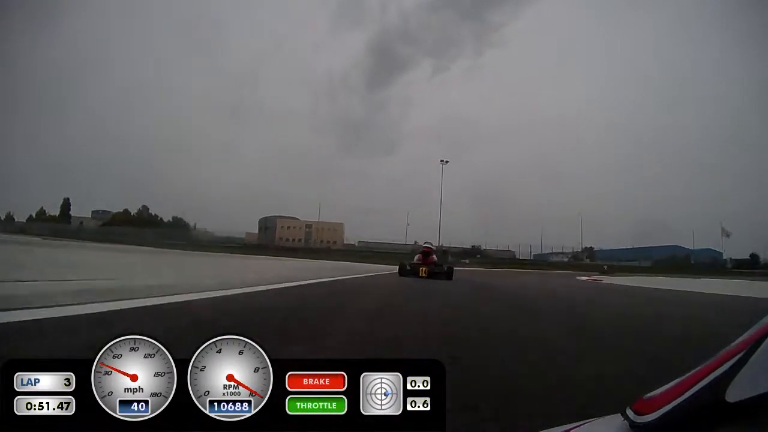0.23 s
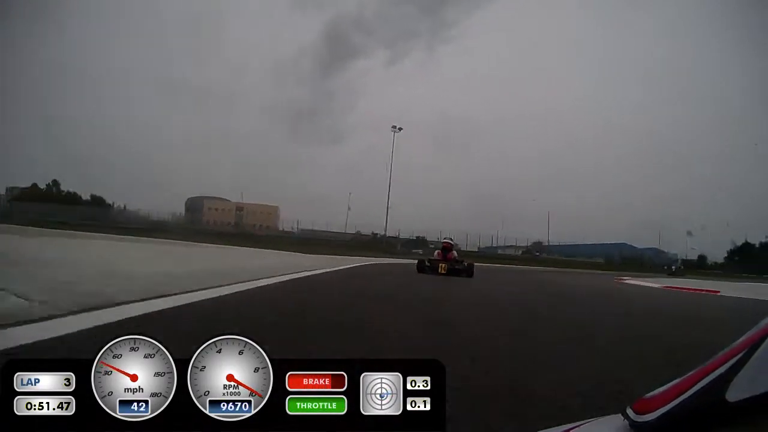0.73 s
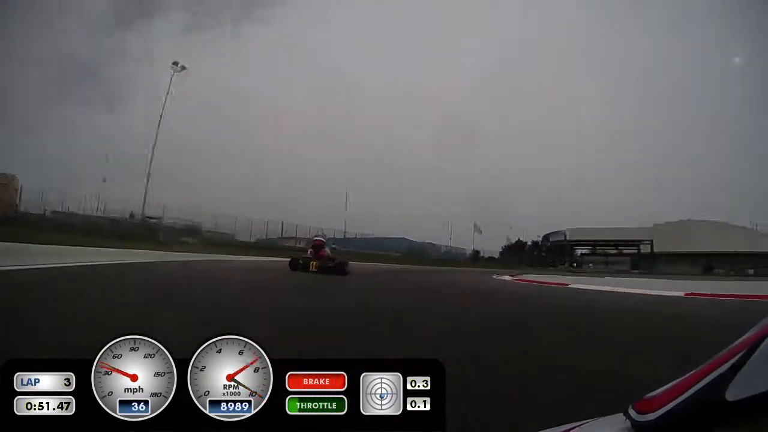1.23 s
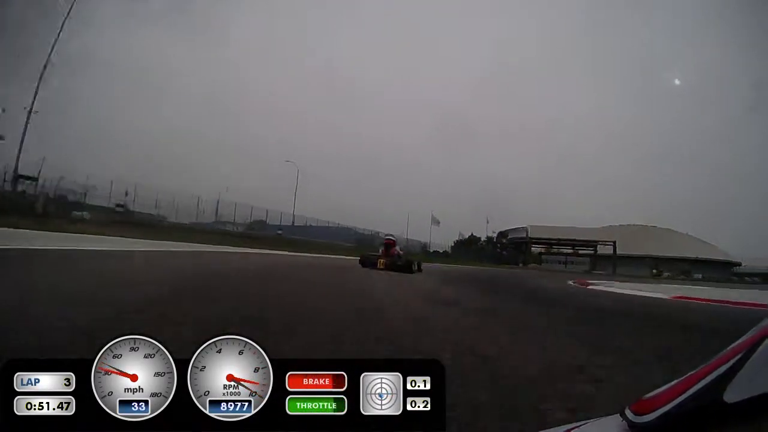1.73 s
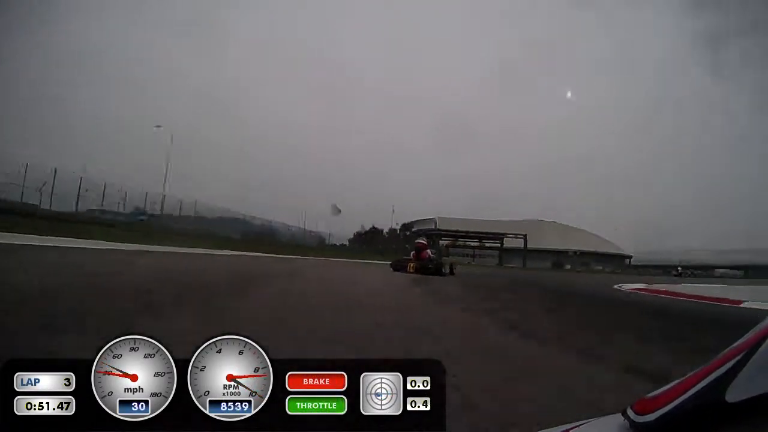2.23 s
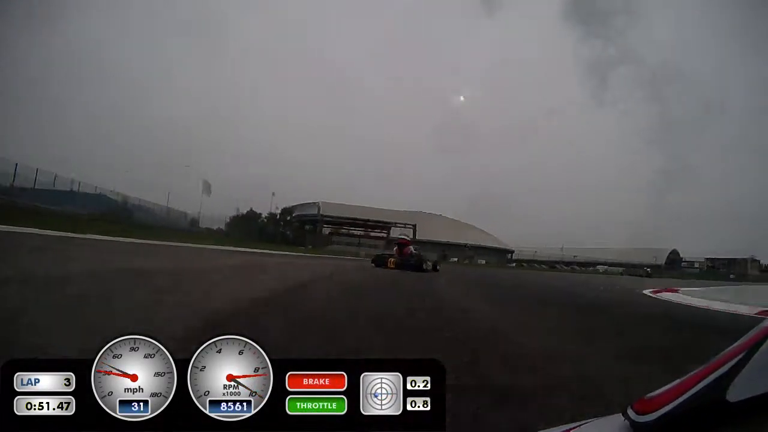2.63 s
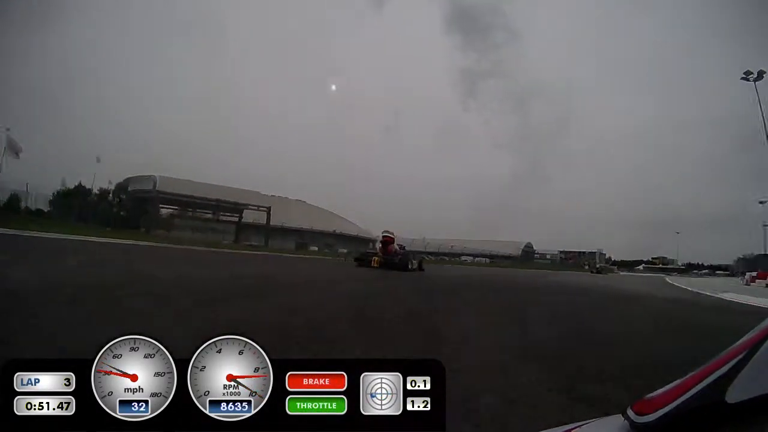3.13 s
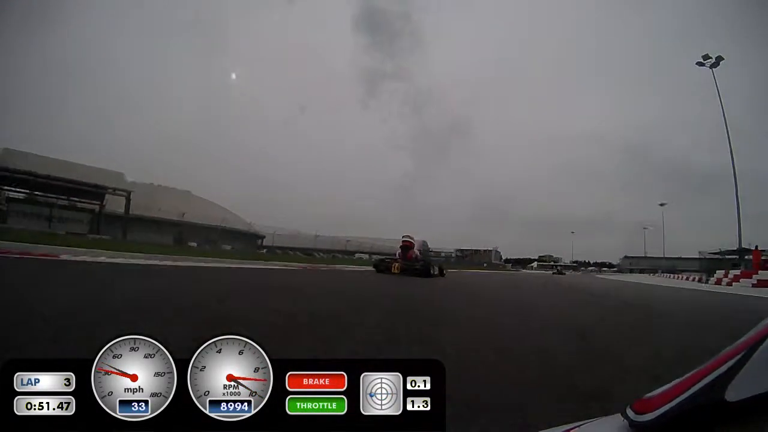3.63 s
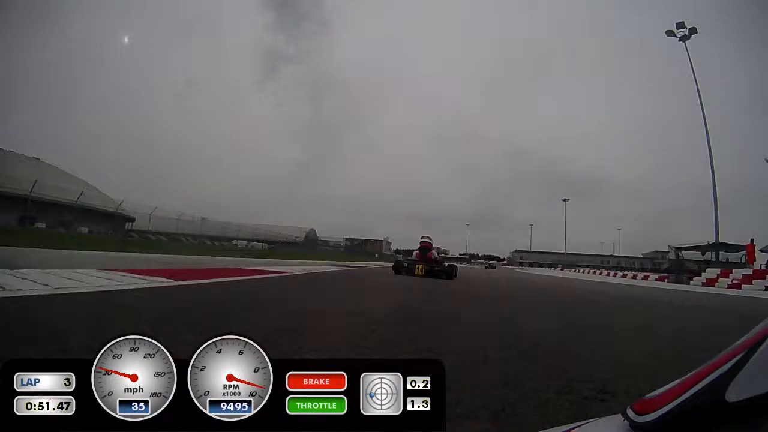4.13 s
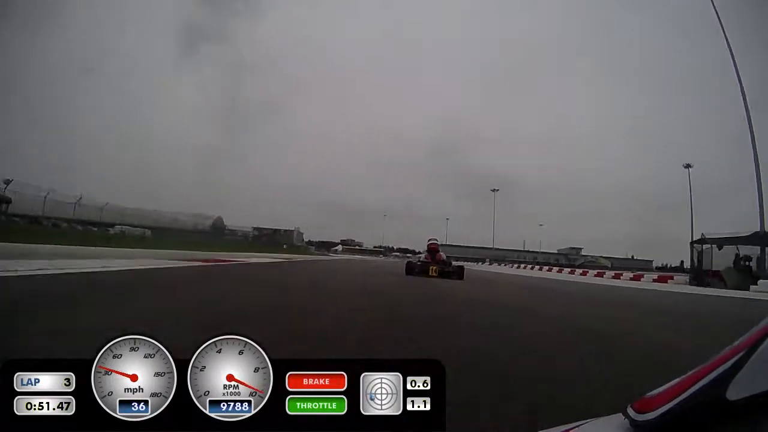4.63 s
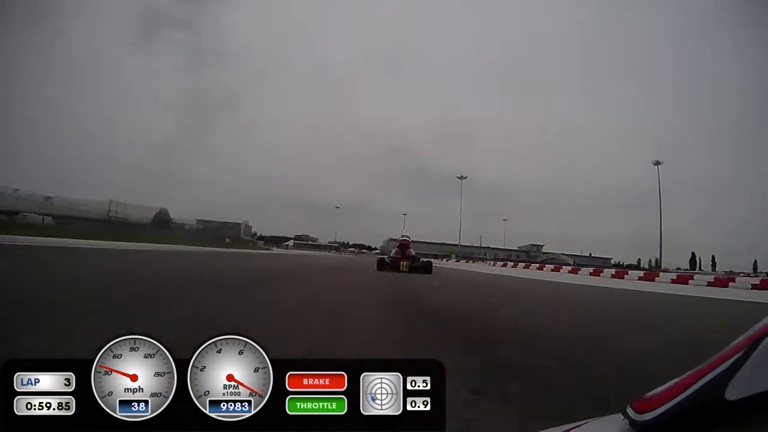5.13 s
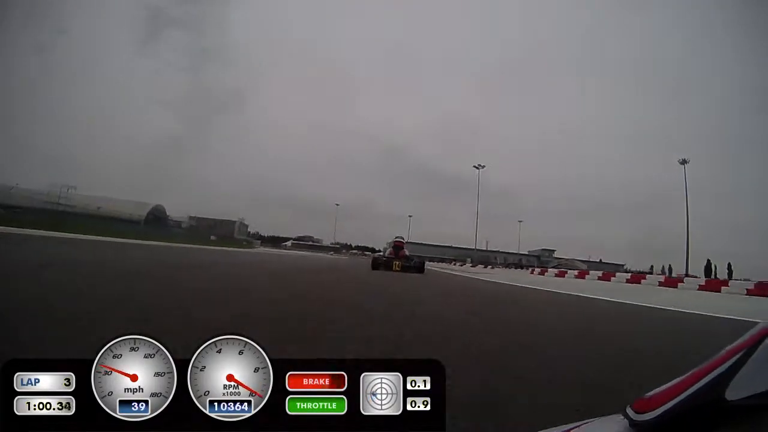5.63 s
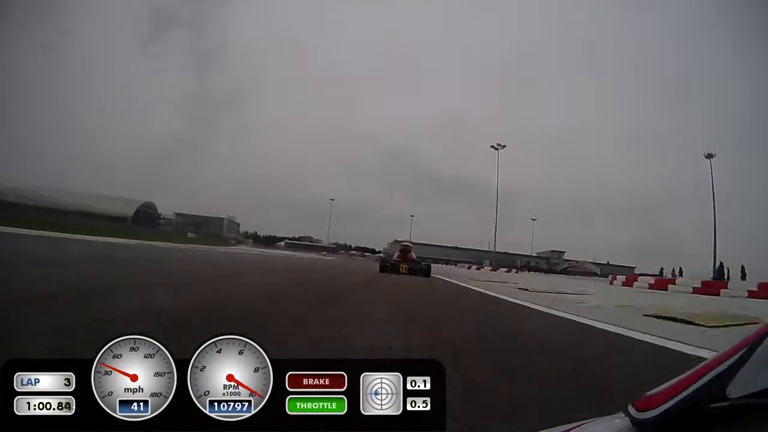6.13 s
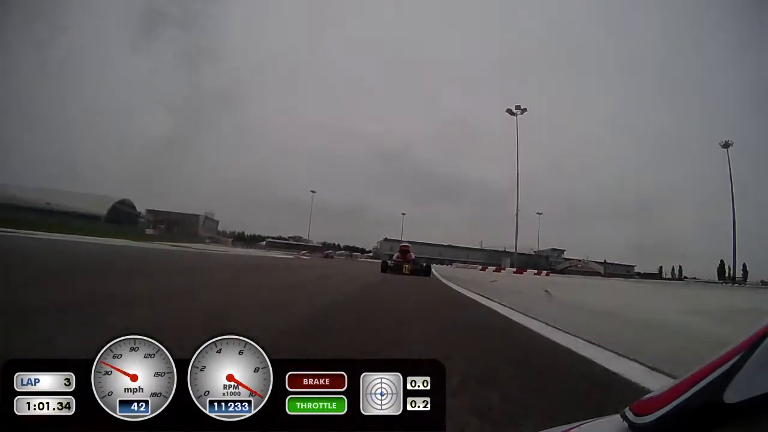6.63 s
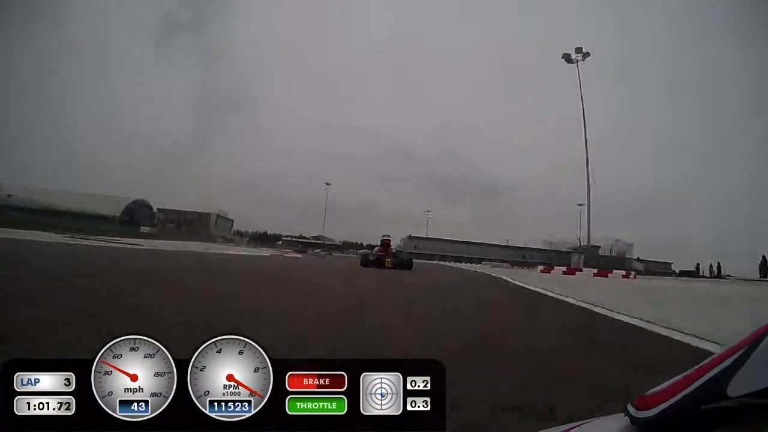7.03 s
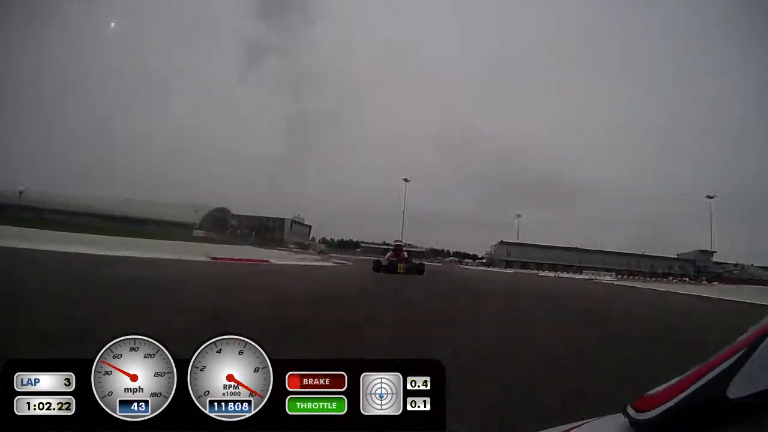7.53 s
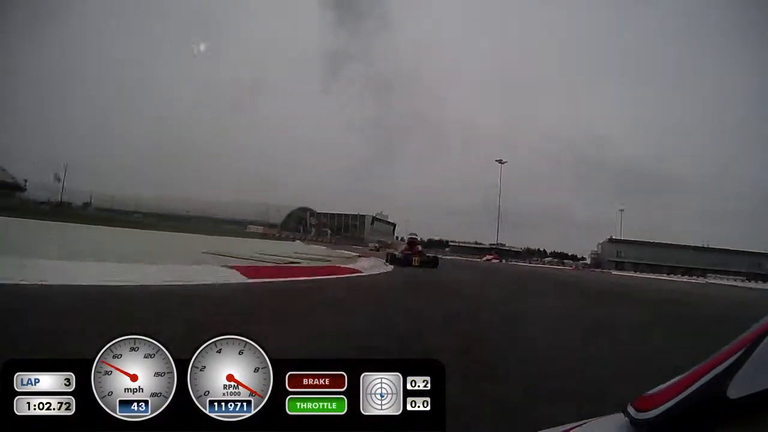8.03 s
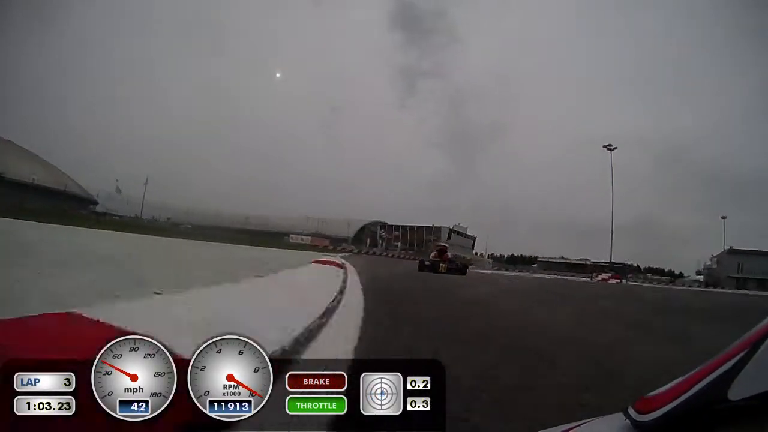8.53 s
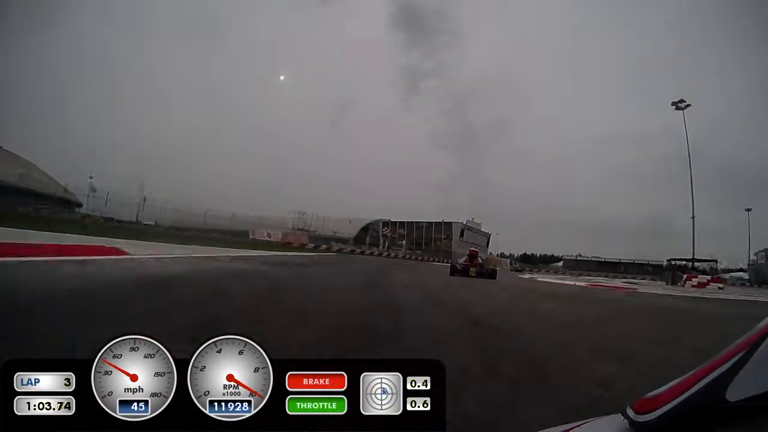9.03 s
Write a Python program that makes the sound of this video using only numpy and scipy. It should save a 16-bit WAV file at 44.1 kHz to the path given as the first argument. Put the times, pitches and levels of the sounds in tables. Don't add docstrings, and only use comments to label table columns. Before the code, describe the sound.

A small two-stroke kart engine is heard from a microphone fixed to its shaking frame on an open circuit. It starts as a high, rough, clipped drone with a nasal housing buzz. At about 0.5 s the driver lifts and the pitch plunges, reaching bottom near 0.85 s with throbbing hiss, flutter and gust thumps, then springs back by about 1.1 s. The revs sag to a lower, steadier growl around 2 to 2.7 s, then climb gradually from 3 s, with surges of buzz near 3.5, 4.2 and 5.8 s and a heavy wind puff around 5.2 s. From 6.9 s the engine is high and strained, with brighter hiss, crackling gusts and knocks. The strongest rattling bursts hit around 8.3 to 8.4 s; revs dip slightly, then rise again until the end at about 9.3 s. Low wind buffeting and a broad roar persist throughout.

```python
import sys
import numpy as np
from scipy import signal
from scipy.fft import rfft, irfft
from scipy.io import wavfile
from scipy.ndimage import uniform_filter1d

SR = 44100
rng = np.random.default_rng(int(sys.argv[2]) if len(sys.argv) > 2 else 0)


def to_wav(s):
    ch = np.atleast_2d(s).T
    pcm = np.round(np.clip(ch, -1, 1) * 32767)
    wavfile.write(sys.argv[1], SR, pcm.astype(np.int16))


def convert_level_to_amplitude(level_db):
    exponent = np.asarray(level_db, float) / 20
    return 10 ** exponent


N = 409248
TIME_S = np.arange(N) / SR
INPUT_LIMIT = 0.51
LIFT_S, LOWEST_S = 0.46, 0.845


def evened(x):
    return x / np.sqrt(np.mean(x ** 2) + 1e-20)


def over_time(rows):
    s, value = np.transpose(rows)
    return np.interp(TIME_S, s, value)


def read(points, hz):
    f, value = np.transpose(points)
    return np.interp(np.log(hz + 1), np.log(f + 1), value)


def coloured(points):
    spectrum = rfft(rng.standard_normal(N))
    return evened(irfft(spectrum * convert_level_to_amplitude(read(points, np.fft.rfftfreq(N, 1 / SR))), N))


def drift(top_hz):
    return evened(signal.lfilter(*signal.butter(2, top_hz, fs=SR), rng.standard_normal(N)))


def ring(x, modes):
    out = 0
    for k, (hz, width_hz, db) in enumerate(modes):
        resonance = signal.iirpeak(hz, hz / width_hz, fs=SR)
        out = out + (-1) ** k * convert_level_to_amplitude(db) * signal.lfilter(*resonance, x)
    return out


def swells(rows):
    t = np.arange(0, N + 64, 64) / SR
    bells = sum(height * np.exp(-((t - s) / length_s) ** 2) for s, length_s, height in rows)
    return np.interp(TIME_S, t, bells)


# time_s, crank_hz
DRIVEN_REVS = [(0.0, 177.8), (0.3, 181.6), (0.5, 182.0), (1.3, 161.8), (1.44, 156.7), (1.68, 146.1),
               (1.91, 142.9), (2.7, 142.2), (3.4, 148.6), (4.2, 162.2), (4.5, 163.3), (5.2, 168.2),
               (6.0, 180.1), (7.11, 196.0), (7.83, 199.1), (8.43, 198.6), (8.63, 195.9), (9.28, 203.9)]


def revs():
    drop_hz, brake_shape = 99, 1.5
    spring_s, spring_shape = 0.145, 1.3
    braking = np.clip((TIME_S - LIFT_S) / (LOWEST_S - LIFT_S), 0, 1) ** brake_shape
    after_s = np.maximum(TIME_S - LOWEST_S, 0)
    still_down = np.exp(-(after_s / spring_s) ** spring_shape)
    return over_time(DRIVEN_REVS) - drop_hz * braking * still_down


def crank_angle():
    hz = revs() * (1 + 0.002111 * drift(top_hz=23.6))
    return 2 * np.pi * np.cumsum(hz) / SR


def unsettled():
    relock_s = 0.29
    steady_s = LOWEST_S + relock_s
    return np.interp(TIME_S, [LIFT_S, LOWEST_S, steady_s, steady_s + 0.15], [0, 1, 1, 0])


# crank_hz, level_db
FIRST = [(74, -11), (125, -8.5), (145, -5.5), (168, -4), (185, -6), (190, -10), (197, -13), (204, -13)]
SECOND = [(74, -18), (125, -19), (143, -26), (150, -25), (166, -36), (180, -26), (189, -16), (200, -15.5)]
THIRD = [(178, -46.5), (188, -34), (197, -29.5), (204, -38.5)]
FOURTH = [(100, -39), (143, -33), (152, -38.5), (162, -31), (170, -35.5), (178, -40.5), (184, -27.5),
          (193, -39.5)]
FIFTH = [(143, -46), (152, -43), (155, -31.5), (168, -29), (172, -43), (181, -47), (187, -29), (198, -40)]


def shake(angle):
    hz = revs()
    fifth_db = read(FIFTH, hz) - 14 * unsettled()
    orders = [
        (1, read(FIRST, hz), 0.7, 0.069),
        (2, read(SECOND, hz), 1.4, 1.54),
        (4, read(FOURTH, hz), 1.7, 0.0037),
        (5, fifth_db, 1.5, 0.4),
        (7, fifth_db - 8.5, 3.0, 0.76),
        (3, read(THIRD, hz), 1.4, 0.8),
    ]
    out = np.zeros(N)
    for order, level_db, waver_db, lag in orders:
        level = convert_level_to_amplitude(level_db + waver_db * drift(top_hz=7.5))
        out += level * np.sin(order * angle + lag)
    return np.sqrt(2) * out


# hz, level_db (per Hz)
BLOW = [(200, 3.5), (500, -3.5), (900, -20.5), (1300, 4), (2200, -8.5), (3000, -31), (5000, -19),
        (8000, -43)]


def firings(angle):
    hz = revs()
    orders = np.arange(3, 36)
    lags = rng.uniform(0, 2 * np.pi, len(orders))
    blow = np.zeros(N)
    for order, lag in zip(orders, lags):
        level = convert_level_to_amplitude(read(BLOW, order * hz[::64])).repeat(64)[:N]
        blow += level * np.cos(order * angle + lag)
    turns = angle / (2 * np.pi)
    strength_db = 0.73 * rng.standard_normal(int(turns[-1]) + 2)
    return evened(blow) * convert_level_to_amplitude(np.interp(turns, np.arange(len(strength_db)), strength_db))


# crank_hz, share
BESIDE = [(143, .95), (144.5, .2), (152, .25), (155, .8), (163, .6), (165, .2), (170, .6), (174, .2)]


def whine(angle):
    lock_top_hz = 1843
    hz = revs()
    beside = read(BESIDE, hz)
    chosen = np.floor(lock_top_hz / hz)
    nearness = 1 / np.hypot(1, (chosen * hz - 1800) / 90)
    tone = {k: np.cos(k * angle + 0.7 * k) for k in range(8, 15)}
    held = np.zeros(N)
    for k in range(9, 14):
        turn_on = uniform_filter1d(1.0 * (chosen == k), 1500)
        held += turn_on * (tone[k] + beside * (0.8 * tone[k - 1] - tone[k + 1]))
    return np.sqrt(2) * held * uniform_filter1d(nearness, 1500) * convert_level_to_amplitude(1.2 * drift(top_hz=29.2))


# pitch_hz, width_hz, level_db
HOUSING = [(1590, 160, -13), (1788, 50, 0), (2080, 320, -19)]
# crank_hz, share
LOCKED = [(74, 0.8), (143, 0.58), (166.5, 0.68), (168.5, 0.6), (172, 0.5), (174, 0.53), (184.5, 0.76),
          (186, 0.37)]
# time_s, level_db
BUZZ_LEVEL = [(0, -24), (.5, -21), (.7, -30.5), (.93, -35), (1.12, -24.5), (1.8, -23), (1.95, -27.5),
              (3.35, -24.5), (3.8, -22.5), (5.25, -21.5), (5.45, -24), (6.25, -20), (6.35, -21.5), (7, -23),
              (8, -21.5), (8.5, -23.5), (9.28, -24)]


def buzz(angle, surge_db):
    locked = read(LOCKED, revs()) + 0.01 * surge_db - 0.25 * unsettled()
    locked = np.clip(locked, 0, 1)
    blows = firings(angle)
    in_step = 0.95 * whine(angle) + 0.3 * evened(ring(blows, HOUSING) + 0.15 * blows)
    rattle = rng.standard_normal(N) * convert_level_to_amplitude(2.1 * drift(top_hz=39.3))
    loose = 1.124 * evened(ring(rattle, HOUSING))
    level = convert_level_to_amplitude(over_time(BUZZ_LEVEL) + surge_db + 4.0)
    return level * (locked * in_step + (1 - locked) * loose)


# pitch_hz, width_hz, level_db
PORT = [(3690, 220, 0), (4040, 280, -1.5), (4740, 200, -3.5), (4950, 150, 0), (5480, 300, -12),
        (6500, 700, -20)]
# crank_hz, level_db
HISS_LEVEL = [(74, -46.5), (128, -45), (145, -42), (166, -40.5), (176, -37.5), (185, -33), (195, -29.5),
              (202, -32.5)]
# crank_hz, level_db
FIZZ_LEVEL = [(120, -15), (142, -3), (180, -4.5), (195, -13.5)]


def hiss(surge_db):
    throb_hz, throb_peak_s = 20.3, 0.648
    hz = revs()
    air = evened(ring(rng.standard_normal(N) * convert_level_to_amplitude(1.47 * drift(top_hz=60)), PORT))
    fizz = coloured([(2000, -9.5), (3000, -7.5), (4200, 7), (5500, -2.5), (7500, -14.5)])
    fizz = fizz * convert_level_to_amplitude(2.5 * drift(top_hz=45))
    both = air * convert_level_to_amplitude(1.4 * drift(top_hz=26)) + convert_level_to_amplitude(read(FIZZ_LEVEL, hz)) * fizz
    overrun = np.clip((150 - hz) / 12, 0, 1) * (TIME_S < 1.1)
    throb = np.cos(2 * np.pi * throb_hz * (TIME_S - throb_peak_s)) - 0.3
    level_db = read(HISS_LEVEL, hz) - 0.04 * surge_db
    level_db = level_db + 1.5 * (TIME_S < LIFT_S)
    level_db = level_db + 1.5 * overrun + 6 * overrun * throb
    return convert_level_to_amplitude(level_db + 3.0) * both


# centre_s, length_s, lift_db
SURGES = [
    (.08, 0.058, 4),
    (.37, 0.092, 2),
    (3.53, 0.15, 3),
    (4.2, 0.14, 4),
    (5.78, 0.24, 4),
    (8.2, 0.024, 2.5),
    (8.275, 0.056, 6.5),
    (8.388, .012, 12),
    (8.802, 0.065, 5.5),
]


def housing_and_port(angle):
    surge_db = swells(SURGES)
    return buzz(angle, surge_db) + hiss(surge_db)


# start_s, peak_db, pitch_hz
KNOCKS = [(0.399, -15.5, 1900), (0.7903, -22, 880), (0.818, -19.5, 867), (0.9724, -14.5, 1900),
          (1.3667, -20, 1580), (5.8506, -21, 1890), (6.8937, -20, 1910), (7.087, -15.5, 1804),
          (7.2498, -13.5, 1846), (7.3931, -27, 1880), (7.857, -34, 1770), (8.2038, -19.5, 1780),
          (8.2876, -5, 1730), (8.3793, -0.5, 1768), (8.548, -14.5, 1855), (9.029, -13, 1820)]


def knocks():
    length = 2600
    t = np.arange(length) / SR
    envelope = np.minimum(t / 0.0015, 1) * convert_level_to_amplitude(-60 * t / 0.041)
    out = np.zeros(N + length)
    for start_s, peak_db, hz in KNOCKS:
        rattle = envelope * rng.standard_normal(length)
        burst = evened(ring(rattle, [(hz, 60, 0)]))
        out[round(start_s * SR):][:length] += convert_level_to_amplitude(min(peak_db, -7) - 13) * burst
    return out[:N]


# start_s, length_ms, direction (1 push, -1 pull)
JOLTS = [(0.699, 4.9, 1), (0.705, 4.3, -1), (0.729, 4.1, -1), (0.749, 4.1, -1), (0.865, 4.3, -1),
         (0.912, 4.2, 1), (0.927, 4.1, -1), (0.956, 4.4, 1), (0.962, 4.5, -1), (1.101, 4.4, 1),
         (1.338, 4.4, -1), (1.37, 4.3, -1), (1.884, 4.1, -1), (5.159, 4.5, -1), (5.173, 4.1, 1),
         (6.881, 7.5, 1), (6.89, 6.8, -1), (6.965, 4.5, -1), (7.062, 6.8, 1), (7.079, 4.4, -1),
         (7.131, 6.6, -1), (7.15, 4.4, -1), (7.29, 8.1, 1), (7.299, 4.2, -1), (7.638, 4.8, -1),
         (7.83, 4.6, -1), (8.132, 6.0, 1), (8.191, 4.2, 1), (8.275, 9.4, -1), (8.303, 4.3, -1)]


def jolts():
    out = np.zeros(N)
    for start_s, length_ms, direction in JOLTS:
        lobe = signal.windows.tukey(round((length_ms + 1) * SR / 1000), 0.6)
        height = INPUT_LIMIT * (length_ms - 1.5) * 0.7
        out[round((start_s - 0.0013) * SR):][:len(lobe)] += direction * height * lobe
    return out


# time_s, level_db
WIND_LEVEL = [(0, -18.5), (.4, -16), (1.5, -14), (2.2, -24), (3.4, -28), (4.5, -18.5), (6.3, -21.5),
              (6.9, -14.5), (8.3, -12.5), (9.28, -18.5)]
# centre_s, level_db
PUFFS = [(.42, -19), (.72, -14.5), (1.368, -8.5), (1.52, -14.5), (2.69, -21), (3.199, -17), (3.601, -23),
         (5.168, -9.5), (5.53, -17), (6.311, -14.5), (8.2, -16.5), (8.919, -16)]
# hz, level_db (per Hz)
GUSTS = [(8, -9.5), (25, 3.5), (60, 2.5), (120, -5.5), (250, -15.5), (500, -32.5), (1000, -34.5),
         (2500, -62), (7000, -59)]


def wind():
    puff_s = 0.032
    flow = convert_level_to_amplitude(over_time(WIND_LEVEL)) + swells([(s, puff_s, convert_level_to_amplitude(db)) for s, db in PUFFS])
    lumps = coloured(GUSTS) * flow * convert_level_to_amplitude(4.0 + 2.2 * drift(top_hz=11.4))
    rush = coloured([(60, 4.5), (200, 3.5), (400, -5.5), (800, -14), (1500, -20.5), (4000, -43.0)])
    return lumps + convert_level_to_amplitude(-18.5) * (revs() / 165) ** 1.7 * rush


def scene():
    angle = crank_angle()
    return (shake(angle) + housing_and_port(angle) + knocks() + jolts() + wind())[None]


def band_limit(x):
    return signal.sosfilt(signal.butter(12, 8050, fs=SR, output="sos"), x)


COUPLING_HZ = (20, 7)


def record(dry):
    x = np.clip(dry, -INPUT_LIMIT, INPUT_LIMIT)
    x = x * np.minimum(np.arange(N) / 12, 1)
    for hz in COUPLING_HZ:
        x = signal.lfilter(*signal.butter(1, hz, "high", fs=SR), x)
    treble_cut = signal.firwin(75, 6870, window=("kaiser", 9), fs=SR)
    x = signal.oaconvolve(x, treble_cut[None], "same")
    return band_limit(x)


dry = scene()
out = record(dry)
to_wav(out)
```